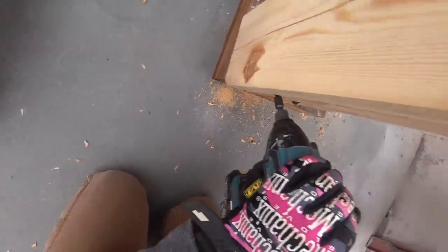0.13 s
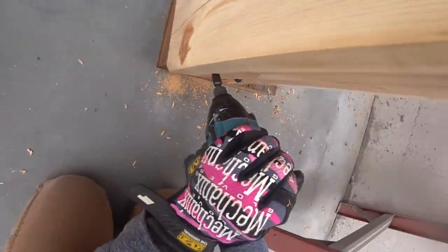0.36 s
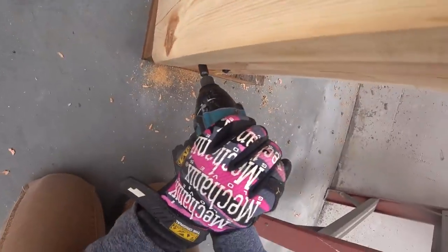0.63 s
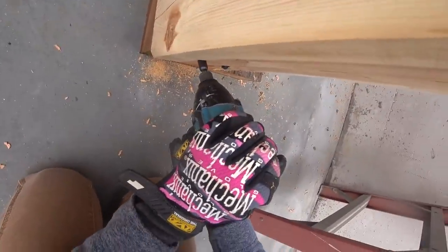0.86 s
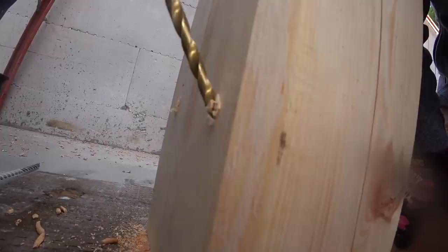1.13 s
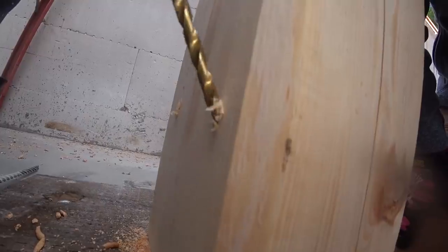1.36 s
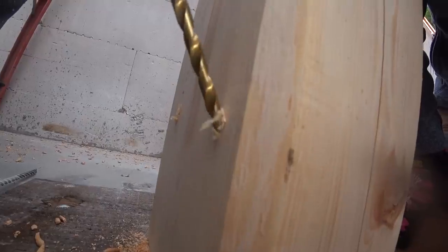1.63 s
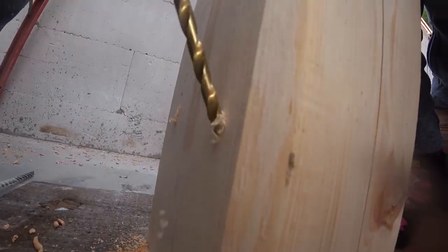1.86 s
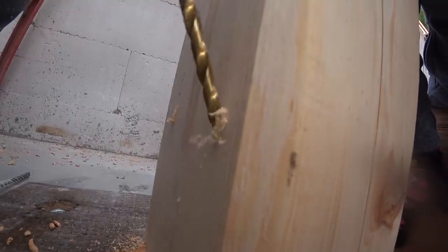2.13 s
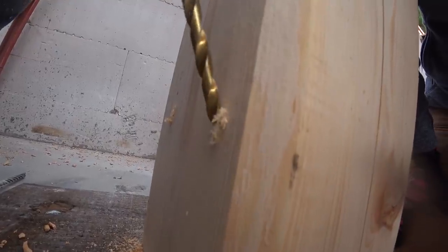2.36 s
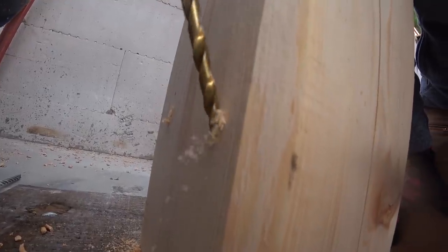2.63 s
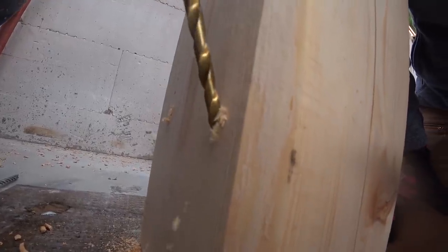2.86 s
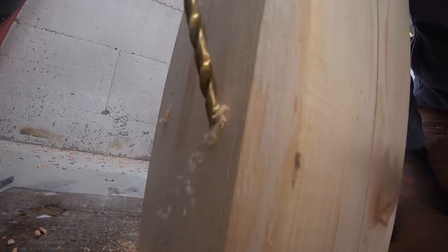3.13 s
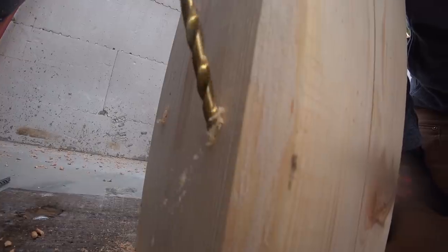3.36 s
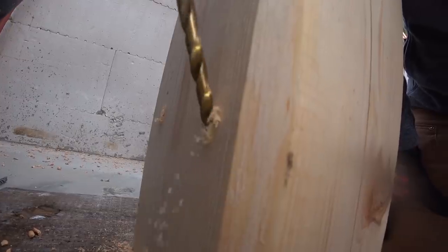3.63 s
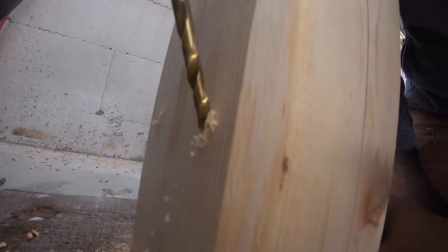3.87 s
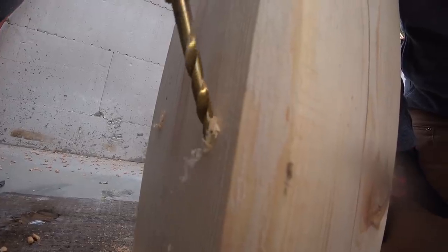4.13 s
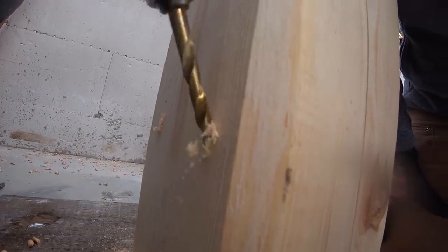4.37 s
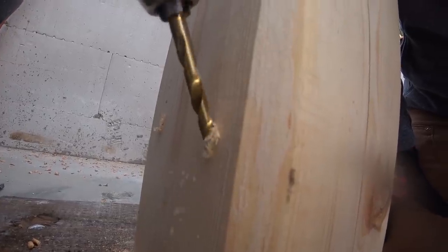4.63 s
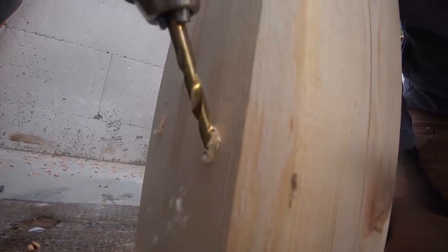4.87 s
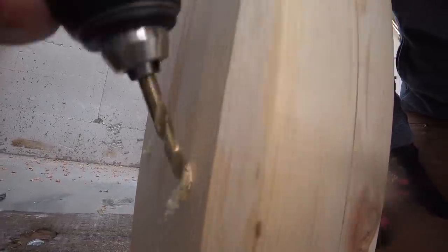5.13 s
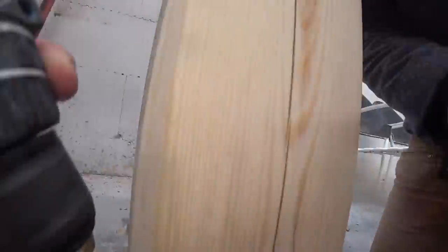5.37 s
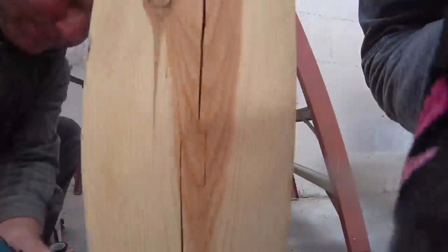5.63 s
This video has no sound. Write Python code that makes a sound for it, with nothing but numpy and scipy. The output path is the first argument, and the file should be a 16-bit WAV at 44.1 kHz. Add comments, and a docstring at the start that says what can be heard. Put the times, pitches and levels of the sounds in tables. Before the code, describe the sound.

A harsh metallic hammering burst, then a high-pitched drill whine pulsing on and off, running steadily through wood and finally pulling free.

```python
"""Impact driver, then cordless drill, in a workshop

Hammer blows rattle and ring a wooden post over the driver's shaft tone, gear tone and whirr. A drill follows
on the run-down of one pull, four short pulls and a long one: sine whines ride its tooth-mesh pitch over gear
hiss and cutting noise. A buzzing whistle marks each new start, trigger ticks sit between and a groan brakes
each stop; late on the bit comes free and the tool swings past. Shaped noise and a wavering hum make the
hard-floored room; a rising low sine bumps the microphone."""
import sys
import numpy as np
from scipy import signal
from scipy.fft import rfft, irfft
from scipy.io import wavfile
from scipy.ndimage import uniform_filter1d

SR = 44100
rng = np.random.default_rng(int(sys.argv[2]) if len(sys.argv) > 2 else 0)


def natural_amplitude(level_db):
    """Convert a level in decibels to a linear amplitude factor, elementwise."""
    exponent = np.asarray(level_db, float) / 20
    return 10 ** exponent


def dump_mix(stems):
    """Bounce the given channels to the path in sys.argv[1] as a 16-bit WAV at rate SR."""
    frames = np.atleast_2d(stems).T  # one column per channel
    limited = np.clip(frames, -1, 1)  # hard clip at full scale
    pcm = np.round(limited * 32767).astype(np.int16)
    wavfile.write(sys.argv[1], SR, pcm)


N = 253565
TIME = np.arange(N) / SR  # s

# drill trigger pulls: pulled_s, let_go_s, at_rest_s, unloaded_top_tooth_mesh_hz, brake_groan_db
PULLS = [(1.0, 1.171, 1.32, 4402, -26.5), (1.375, 1.455, 1.545, 4262, -34),
         (1.661, 1.786, 1.889, 4656, -26), (2.023, 2.231, 2.334, 4662, -33),
         (2.428, 2.765, 2.868, 4615, -27.5), (2.954, 6.0, 6.1, 4620, -28)]
# bit backs out and tool swings past: start_s, hiss_swell_centre_hz, swell_db, treble_change_db
SWING = [(5.2, 4900, -52, 6), (5.28, 5160, -22, -4), (5.45, 5280, -32, -5), (5.52, 5900, -21, -6),
         (5.6, 7400, -22, 0), (5.68, 7670, -45, -1)]


def level(x):
    """Scale to rms 1."""
    return x / np.sqrt(np.mean(x ** 2))


def colour(x, points):
    """Filter a sound through an EQ curve of (Hz, dB) points."""
    hz, db = np.transpose(points)
    f = np.fft.rfftfreq(x.shape[-1], 1 / SR) + 1
    gain = natural_amplitude(np.interp(np.log(f), np.log(hz), db))
    return irfft(rfft(x) * gain, x.shape[-1])


def hiss(points):
    """Coloured noise of rms 1."""
    return level(colour(rng.standard_normal(N), points))


def wide(points):
    """Coloured noise with a share that differs left and right."""
    # differing share: pitch_hz, level_db
    side_share = [(25, -14), (60, -24), (150, -32), (300, -31), (1000, -9), (11000, -8)]
    side = colour(hiss(points), side_share)
    return hiss(points) + side * np.array([[1], [-1]])


def ring(x, hz, width):
    """One resonance with gain 1 at its centre; centre and width in Hz."""
    return signal.lfilter(*signal.iirpeak(hz, hz / width, fs=SR), x)


def walk(rate):
    """Smooth random drift of rms 1: noise averaged twice over 1 / rate seconds."""
    k = int(SR / rate)
    once = uniform_filter1d(rng.standard_normal(N), k)
    return level(uniform_filter1d(once, k))


def add(track, s, piece):
    """Mix a short sound in at a time in seconds."""
    i = int(s * SR)
    track[i:i + len(piece)] += piece[:N - i]


def pan(x, pan_db):
    """Place a sound between the channels by left minus right dB."""
    return x * natural_amplitude(np.array([pan_db, -pan_db]) / 2)


def shop():
    """Air and machine rumble with a wavering hum, mostly alike left and right."""
    # rumble colour: pitch_hz, relative_density_db
    rumble_colour = [(12, -35), (20, -7), (69, -7.5), (106, -17), (145, -2), (194, -7.5), (227, -13),
                     (488, -12), (572, -20), (670, -25), (1080, -24), (1520, -23.5), (1930, -35),
                     (4030, -46), (11000, -61), (14300, -91), (22000, -120)]
    # rumble loudness: start_s, level_db
    rumble_level = [(0, -58), (1.17, -49), (1.2, -46.5), (2.2, -48.5), (3, -48.5), (5.2, -52.5),
                    (5.75, -43.5)]
    # hum: pitch_hz, waver_rate_per_s, loudest_level_db
    hum_setting = (124.5, 13, -49)
    hz, rate, db = hum_setting
    hum = natural_amplitude(db + 0.76 * walk(rate)) * np.sin(2 * np.pi * hz * TIME + 0.96 * walk(rate))
    hum_gain = np.interp(TIME, [1.18, 1.2, 5.0, 5.4], [0.099, 1, 0.67, 0.19])
    rumble = natural_amplitude(np.interp(TIME, *np.transpose(rumble_level))) * wide(rumble_colour)
    return rumble + hum * hum_gain


def bump():
    """One dull knock on the microphone housing: a windowed low sine, rising in pitch."""
    # knock: start_s, reference_pitch_hz (swept from 0.3 to 2 times this), level_db, length_s
    knock = (5.708, 100, -23, .03)
    s, hz, db, length = knock
    out, t = np.zeros(N), np.arange(int(length * SR)) / SR
    tone = np.sin(2 * np.pi * hz * t * (0.3 + 0.85 * t / length))
    add(out, s, natural_amplitude(db) * np.hanning(len(t)) * tone)
    return out


def blows_counted(t):
    """Integrate the hammer speed into a running count of blows since the first."""
    # hammer speed: start_s, blows_per_s
    blow_rate = [(0, 44.39), (.3, 44.55), (.55, 45.52), (.7, 46.44), (1.2, 48.87)]
    first_blow_s = .0173
    count = np.cumsum(np.interp(t, *np.transpose(blow_rate))) / SR
    return count - np.interp(first_blow_s, t, count)


def hammer(times):
    """Each blow excites a bright metal rattle with its own colour, then a duller knock in the wood."""
    # anvil modes: pitch_hz, width_hz, level_db (relative to the rattle)
    anvil = [(3800, 190, -19), (5050, 230, -10)]
    # ring of the lighter touch: pitch_hz, width_hz
    pawl_ring = (5170, 260)
    crack_mean_db, crack_scatter_db = -8.5, 0.4
    crack_low_hz, crack_high_hz = 4300, 8100
    knock_start_db, knock_rise_db_per_s, knock_scatter_db = -2.5, 6.5, 2.5
    out, t = np.zeros((2, N)), np.arange(900) / SR
    chance = rng.standard_normal((len(times), 4, len(t)))
    # a burst of about 2 ms over a softer, longer tail
    decay = np.exp(-(t / 0.0021) ** 2.3) + natural_amplitude(-16.5) * np.exp(-t / 0.0065)
    rattle = np.minimum(t / 0.00046, 1) * decay
    knock = t / 0.0016 * np.exp(-t / 0.0011)
    touch = t / 0.0013 * np.exp(-t / 0.0021)
    for s, noises, bright in zip(times, chance, rng.random(len(times))):
        crack_noise, knock_noise, touch_noise, side_noise = noises
        # single samples of the noises also serve as the scatter from blow to blow
        crack_db = crack_mean_db + crack_scatter_db * side_noise[-1]
        knock_db = knock_start_db + knock_rise_db_per_s * s + knock_scatter_db * knock_noise[-1]
        crack_hz = crack_low_hz + (crack_high_hz - crack_low_hz) * bright
        # even out the strength of the attack
        crack_noise = crack_noise / np.sqrt(np.mean(crack_noise[:90] ** 2))
        for ear, sign in zip(out, (1, -1)):
            crack = rattle * (crack_noise + sign * 0.18 * side_noise)
            add(ear, s, natural_amplitude(crack_db) * ring(crack, crack_hz, 4500))
            for mode_hz, width, db in anvil:
                add(ear, s, natural_amplitude(crack_db + db) * ring(rattle * crack_noise, mode_hz, width))
            add(ear, s, natural_amplitude(knock_db) * ring(knock * knock_noise, 1950, 700))
            # a lighter touch of hammer on anvil follows later in the cycle
            touch_s = s + 0.011 + 0.00067 * touch_noise[0]
            touch_db = -9 + 2 * touch_noise[1]
            add(ear, touch_s, natural_amplitude(touch_db) * ring(touch * touch_noise, *pawl_ring))
    return out


def driver():
    """The even beat of the blows keeps the post humming on its multiples, over shaft tone and whirr."""
    # motor and rings: start_s, shaft_tone_db, post_ring_db, bit_ring_db, left_minus_right_db
    course = [(0, -43, -36, -42, -3.5), (.12, -38.5, -40.5, -57, -2), (.55, -36, -29, -43, -.7),
              (.72, -42, -37, -42, -2.3), (.87, -44, -29.5, -46, -1.5), (1.0, -35, -38.5, -38, -1.5),
              (1.2, -38, -32, -39, -2)]
    # gear tone: start_s, level_db
    gear_tone = [(0, -35), (.3, -34), (.5, -32.5), (.6, -36), (.66, -60), (1.2, -60)]
    # resonances of the post: pitch_hz, width_hz, level_db
    post_modes = [(357, 32, -13), (654.5, 14, -6), (792, 34, -6), (935, 54, -16), (1018, 28, -5),
                  (1360, 58, -1), (1980, 210, 0.5), (2600, 30, 2)]
    # whirr colour: pitch_hz, relative_density_db
    whirr_colour = [(59, -51), (100, -9), (228, -1.5), (295, -5), (701, -4), (1020, 2.5), (1150, -1),
                    (1950, 1.5), (3000, -0.5), (3800, 4), (4200, -5), (7000, -2), (11000, -9.5),
                    (14300, -38), (22000, -120)]
    end_s, whirr_db = 1.2, -29.5
    s, *columns = np.transpose(course)
    t = TIME[:int(end_s * SR)]
    tone_db, post_db, bit_db, pan_db = (np.interp(t, s, c) for c in columns)
    count = blows_counted(t)
    beat, rate = 2 * np.pi * count, np.gradient(count) * SR
    # the shaft turns five times a blow, the gear tone cycles 23 times
    out = natural_amplitude(tone_db) * np.sin(5 * beat)
    out += natural_amplitude(np.interp(t, *np.transpose(gear_tone))) * np.sin(23 * beat)
    for k in range(6, 62):
        gain = sum(natural_amplitude(db) / (1 + (2 * (k * rate - hz) / width) ** 2) for hz, width, db in post_modes)
        drift = np.interp(t, np.linspace(0, t[-1], num=12), rng.standard_normal(size=12))
        # low multiples follow the post ring, high ones the bit ring
        ring_db = (post_db if k < 28 else bit_db) + 3.2 * drift
        phase = 2 * np.pi * rng.random() + 1.0 * drift
        out += natural_amplitude(ring_db) * gain * np.sin(k * beat + phase)
    out = out + natural_amplitude(whirr_db) * wide(whirr_colour)[:, :len(t)]
    out *= np.clip((t[-1] - t) / 0.014, 0, 1)
    blow_times = np.interp(np.arange(int(count[-1]) + 1), count, t)
    out += hammer(blow_times)[:, :len(t)]
    return np.pad(pan(out, pan_db), ((0, 0), (0, N - len(t))))


def swing():
    """A broad band of hiss that climbs: low-passed noise shifted up by a gliding sine."""
    s, hz, db, _ = np.transpose(SWING)
    low_pass = signal.butter(2, 600, fs=SR, output="sos")
    band = level(signal.sosfilt(low_pass, rng.standard_normal(N)))
    rise = np.sin(2 * np.pi * np.cumsum(np.interp(TIME, s, hz)) / SR)
    return natural_amplitude(np.interp(TIME, s, db, left=-120, right=-120)) * band * rise


def brake():
    """A short falling sine groans partway through the run-down at each stop."""
    from_share, length_share = .43, 0.38  # shares of the run-down time
    start_hz, end_hz = 1243, 904
    out = np.zeros(N)
    for _, let_go, rest, _, db in PULLS[:-1]:
        run_down_s = rest - let_go
        hz = np.linspace(start_hz, end_hz, int(length_share * run_down_s * SR))
        groan = np.hanning(len(hz)) * np.sin(2 * np.pi * np.cumsum(hz) / SR)
        add(out, let_go + from_share * run_down_s, natural_amplitude(db) * groan)
    return out


def trigger():
    """Small soft plastic ticks: two decaying sine modes with a softened attack."""
    # ticks: start_s, high_mode_db, low_mode_db
    ticks = [(1.332, -30.5, -43.5), (1.349, -45, -50), (1.366, -51, -54), (1.625, -38, -64),
             (1.987, -35, -57), (2.387, -36, -50), (2.405, -42, -42), (2.415, -35, -58), (2.913, -27, -40),
             (2.927, -35, -47), (2.942, -24, -34)]
    # plastic modes, low then high: pitch_hz, t60_s
    modes = [(1850, 0.036), (2900, 0.011)]
    out, t = np.zeros(N), np.arange(2000) / SR
    low, high = (np.sin(2 * np.pi * hz * t) * np.exp(-np.log(1000) * t / t60) for hz, t60 in modes)
    for s, high_db, low_db in ticks:
        add(out, s, np.minimum(t / 0.0013, 1) * (natural_amplitude(high_db) * high + natural_amplitude(low_db) * low))
    return out


def whistle(hz):
    """The chopped motor current sings and buzzes; the turning rotor splits the note up and down."""
    # buzz colour: pitch_hz, relative_density_db
    buzz_colour = [(1500, -14), (3000, -6), (6000, -10), (7700, 0), (9000, -8), (11000, -25)]
    chop_hz, lead_s, length_s = 7780, .013, .038
    base_db, buzz_db = -33, -13  # the buzz is relative to the swell
    count = int(length_s * SR)
    # each swell grows from half to 1.3 times the base level
    shape = signal.windows.tukey(count, .3) * np.linspace(.5, 1.3, count)
    swell = np.zeros(N)
    for pulled, *_ in PULLS[1:]:
        add(swell, pulled - lead_s, natural_amplitude(base_db) * shape)
    split = np.cos(2 * np.pi * np.cumsum(.45 * np.maximum(hz - 800, 0)) / SR)
    note = np.sin(2 * np.pi * chop_hz * TIME) * (0.5 + split)
    return swell * (note + natural_amplitude(buzz_db) * hiss(buzz_colour))


def bit_free():
    """0 while the bit is in the wood, sliding to 1 as it comes out."""
    out_s, slide_s = 5.22, 0.056
    return np.clip((TIME - out_s) / slide_s, 0, 1)


def motor():
    """Tooth mesh Hz and the dB of each layer: a quick spin-up, then a steepening fall after letting go."""
    # loudness on spin-up: share_of_top_speed, whine_db, slower_stage_db, gear_hiss_db, cutting_db
    run_up = [(0, -70, -50, -45, -48), (.14, -55, -30, -25, -29), (.3, -25, -8, -6, -8),
              (.6, -2, -3, -1.5, -2), (.82, 4, -3, -2, -3), (.95, -.5, -2, 0, .5), (1, 0, 0, 0, 0)]
    # loudness on run-down: the same columns
    run_down = [(0, -70, -50, -60, -60), (.24, -40, -15, -37, -13), (.45, -34, -25, -16, -9.5),
                (.63, -13, -8, -5.5, -2), (.87, -0.5, -10, -1.5, 3.5), (.97, 2, 0, 0, 2.5),
                (1, 1, -1.5, 0, 0)]
    spin_up_s, spin_up_bend, run_down_bend = .0285, 1.3, 2.3
    # the deepening hole slows the motor until the bit is out
    sag_share_per_s = .0025
    # a slow random sway keeps the motor pitch wandering
    slow_sway_share = .0025
    pulls = np.array(PULLS)
    latest = np.maximum(np.searchsorted(pulls[:, 0], TIME) - 1, 0)
    pulled, let_go, rest, top_hz, _ = pulls[latest].T
    up = 1 - np.exp(-(np.maximum(TIME - pulled, 0) / spin_up_s) ** spin_up_bend)
    down = 1 - np.clip((TIME - let_go) / (rest - let_go), 0, 1) ** run_down_bend
    (rising, *up_db), (falling, *down_db) = np.transpose(run_up), np.transpose(run_down)
    layers_db = [np.interp(up, rising, a) + np.interp(down, falling, b) for a, b in zip(up_db, down_db)]
    sag = sag_share_per_s * (TIME - pulled) * (1 - bit_free())
    slowing = sag + slow_sway_share * walk(5.99)
    return top_hz * up * down * (1 - slowing), layers_db


def drill():
    """Gear tones ride the motor speed: the whine wavers more below full speed, other stages chatter most at it."""
    # facing the microphone: start_s, whine_db, slower_stage_db, cutting_db, left_minus_right_db
    facing = [(1.19, -24, -41, -29, 2), (1.5, -26, -32, -30, 0.5), (1.8, -22, -33, -28, 1.2),
              (2.199, -21, -33.5, -29.5, 1), (3.1, -20, -29.5, -29.5, 0.2), (3.6, -17.5, -31, -29, 0.2),
              (4.5, -19.5, -28, -29, 0.7), (5.07, -19.5, -29, -28.5, 1.5), (5.15, -32, -24, -27.5, 2),
              (5.25, -18, -23, -29.5, 0.7), (5.34, -19.5, -44, -29.5, 3.5), (5.47, -16.5, -34, -33.5, 5.5),
              (5.53, -32, -30, -30.5, 5.5), (5.63, -36, -37, -29, 2.5), (5.69, -23.5, -53, -28, 2),
              (5.75, -26, -42, -29.5, 0)]
    # other gear stages: multiple_of_tooth_mesh, level_over_hiss_db, waver_db
    stages = [(.809, -9.5, 3), (.923, -14, 1.5), (1.603, -12, 2), (2.281, -20, 2.5)]
    # housing response: pitch_hz, level_db
    housing = [(800, -16), (2400, -20), (2900, 8), (3300, 9), (3700, -1), (11000, 5)]
    # gear hiss colour: pitch_hz, relative_density_db
    gear_colour = [(1290, -12), (2200, -35), (2640, -8), (2780, -4.5), (3000, -7), (3620, -4.5), (4310, -6),
                   (4520, -4.5), (4770, -9), (4900, -6.5), (7340, -6), (10600, -13.5), (11000, -14),
                   (14300, -48), (22000, -120)]
    # cutting noise colour: pitch_hz, relative_density_db
    wood_colour = [(120, -55), (200, -10), (255, -1), (305, -18.5), (370, -3.5), (440, -5.5), (570, -8),
                   (720, -1), (900, -2), (1100, -4), (1340, -2), (2000, 1), (2400, -6), (2700, -4.5),
                   (3400, -23), (5700, -90)]
    # share of the cutting noise that the post carries: pitch_hz, level_db
    post_boom = [(380, -5.5), (430, -38)]
    # a small tool gives no bass: pitch_hz, level_db
    small_body = [(150, -45), (240, 0)]
    hiss_db, heard_from_s = -20, 1.185
    chuck_turn_s, chuck_facing_s = .1519, 3.268
    drone_multiple, drone_db = 0.11, -42.5
    s, *columns = np.transpose(facing)
    whine_db, slow_db, cut_db, pan_db = (np.interp(TIME, s, c) for c in columns)
    hz, (whine_speed_db, slow_speed_db, hiss_speed_db, cut_speed_db) = motor()
    whine_db, slow_db = whine_db + whine_speed_db, slow_db + slow_speed_db
    gear_db, cut_db = hiss_db + hiss_speed_db, cut_db + cut_speed_db

    # below full speed the whine wavers more in pitch and level
    slack = np.clip(1 - hz / 4600, 0, .3)
    pitch_waver = (0.0023 + 0.026 * slack) * walk(152)
    turn = 2 * np.pi * np.cumsum(hz * (1 + pitch_waver)) / SR
    out = natural_amplitude(whine_db + (1.2 + 6 * slack) * walk(130)) * np.sin(turn)

    # the slower stage swells once a chuck turn, less so half a turn on
    chuck = 2 * np.pi * (TIME - chuck_facing_s) / chuck_turn_s
    throb = 1 + 0.48 * np.cos(chuck) + 0.62 * np.cos(2 * chuck)
    slow_tone = np.sin(.6055 * turn + 0.22 * walk(46))
    out += natural_amplitude(slow_db + 1.0 * walk(30)) * throb * slow_tone
    for multiple, db, waver_db in stages:
        shell_db = np.interp(multiple * hz, *np.transpose(housing))
        # the teeth mesh more cleanly while the speed changes and chatter most at full speed
        chatter = (1.4 - 3 * slack) * walk(230)
        stage_db = db + gear_db + shell_db + waver_db * walk(28)
        out += natural_amplitude(stage_db) * np.sin(multiple * turn + chatter)

    gears = wide([(700, -90)] + gear_colour)
    # the top of the hiss brightens, then dulls, as the tool moves
    treble_change = natural_amplitude(np.interp(TIME, *np.transpose(SWING)[[0, 3]], left=0)) - 1
    gears = gears + treble_change * colour(gears, [(7000, -30), (8200, -4.5)])
    # loose gears rattle the housing while the speed is down
    loose = 2.5 * slack * level(ring(rng.standard_normal(N), 3180, 860))
    out = out + natural_amplitude(gear_db + 0.74 * walk(150)) * (gears + loose)

    # once the bit is out of the wood the post stops booming and the free motor drones
    wood, free = wide(wood_colour), bit_free()
    out += natural_amplitude(cut_db + 0.85 * walk(40)) * (wood - free * colour(wood, post_boom))
    drone = np.sin(drone_multiple * turn + .5 * walk(30))
    out += free * natural_amplitude(drone_db + 1.6 * walk(25)) * drone
    out *= (hz > 0) * np.clip((TIME - heard_from_s) / 0.02, 0, 1)
    out = colour(out, small_body) + whistle(hz) + trigger() + brake() + swing()
    return pan(out, pan_db)


def room(x):
    """Decaying noise echoes: quick weak reflections off floor and post, then the faint tail of the walls."""
    t = np.arange(SR // 2) / SR
    near = natural_amplitude(-36.0) * np.exp(-t / 0.015) * (t > .0008)
    walls = natural_amplitude(-61.0) * np.exp(-t / 0.097)
    noise = (near + walls) * rng.standard_normal((2, len(t)))
    echo = colour(noise, [(150, -11), (900, 4.0), (2200, 0.5), (3600, 3), (6000, -2.0), (11000, -1)])
    return x + signal.fftconvolve(x, echo, axes=1)[:, :N]


def scene():
    """Both tools in the room, over the background."""
    return room(driver() + drill()) + shop() + bump()


def top_cut(x):
    """Nothing passes above the cut-off."""
    return signal.sosfilt(signal.butter(12, 12360, fs=SR, output="sos"), x)


def record(dry):
    """The two microphone ports differ in phase; a steep filter ends the treble."""
    turn = np.exp(.22j * np.array([[1], [-1]]))  # radians, opposite in the two channels
    ports = irfft(rfft(dry) * turn, N)
    mix = colour(ports, [(10980, 0), (11030, -8), (11150, -45), (11400, -58), (12400, -75)])
    return top_cut(mix)


dry = scene()
out = record(dry)
dump_mix(out)
```